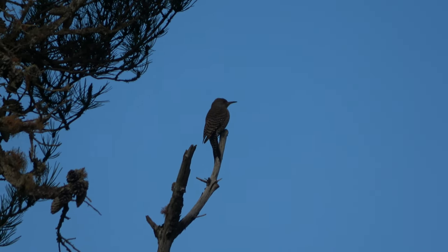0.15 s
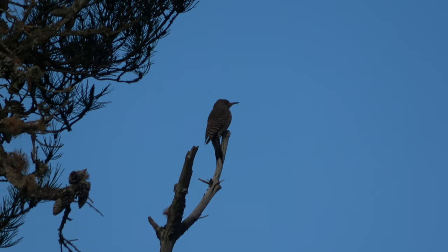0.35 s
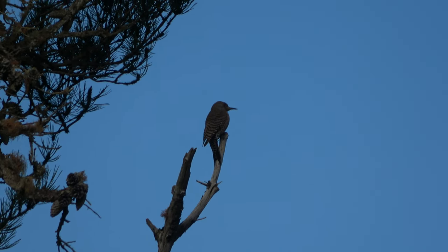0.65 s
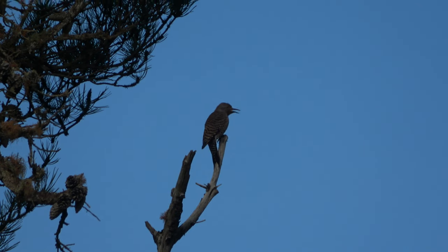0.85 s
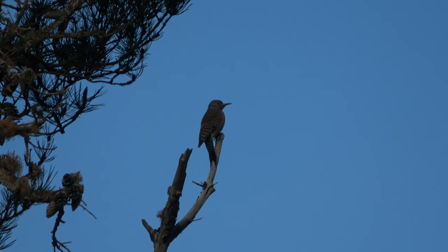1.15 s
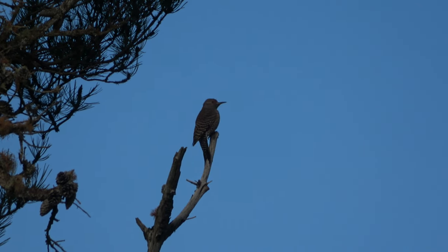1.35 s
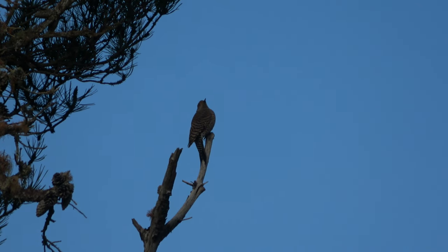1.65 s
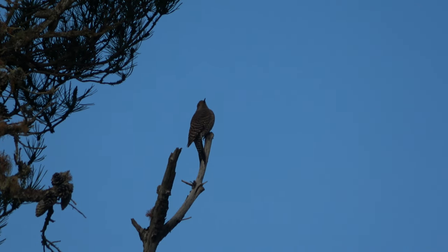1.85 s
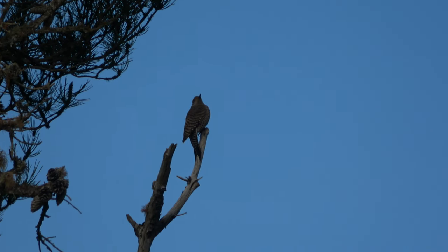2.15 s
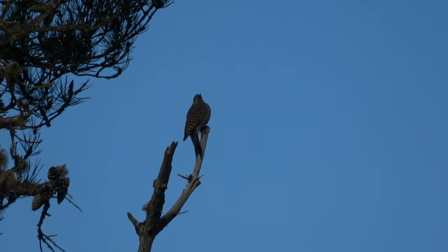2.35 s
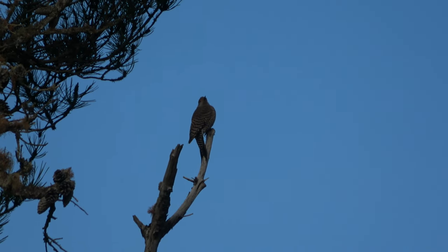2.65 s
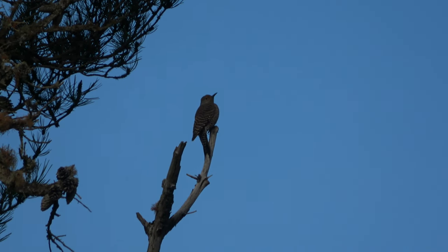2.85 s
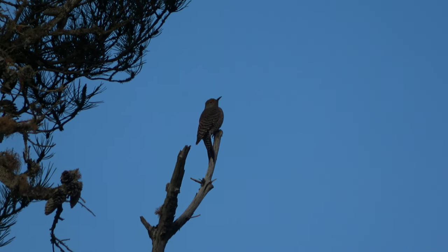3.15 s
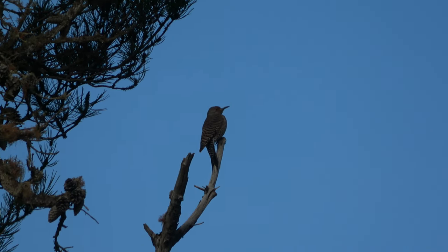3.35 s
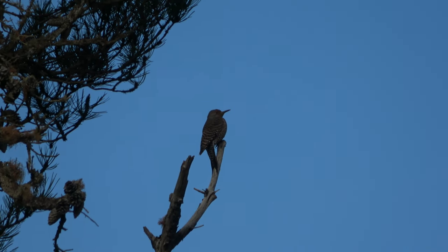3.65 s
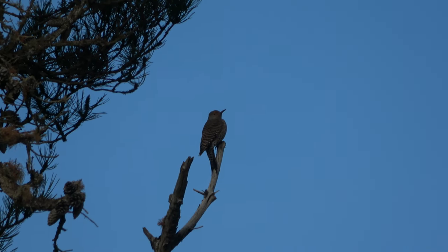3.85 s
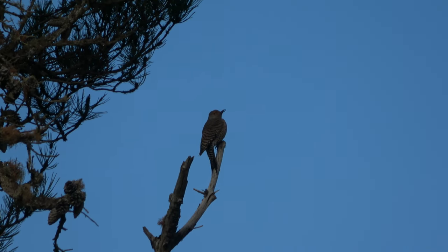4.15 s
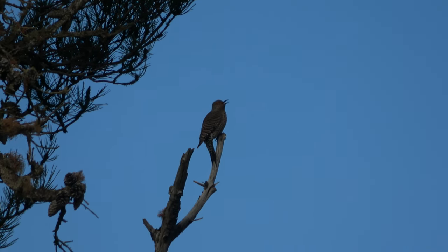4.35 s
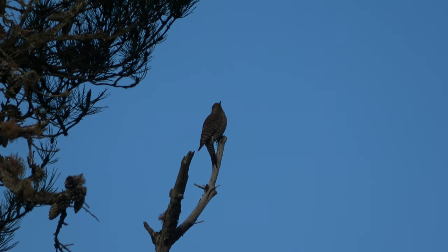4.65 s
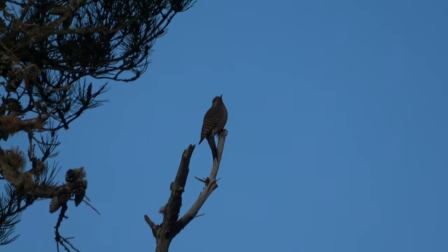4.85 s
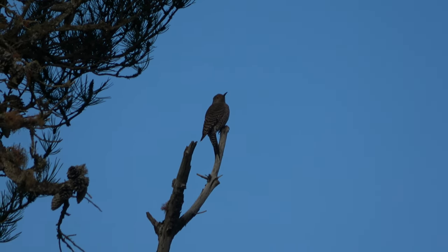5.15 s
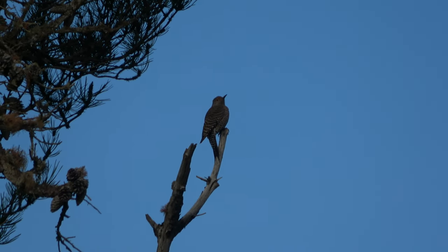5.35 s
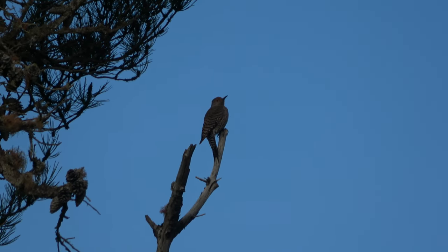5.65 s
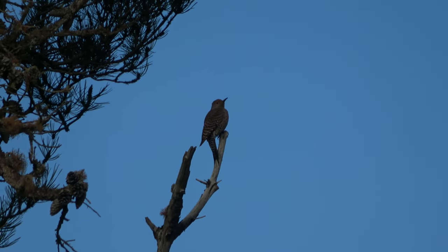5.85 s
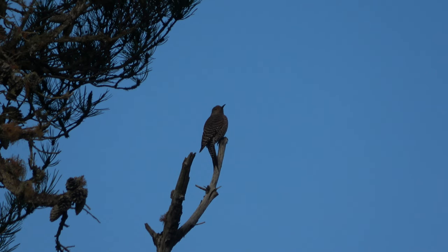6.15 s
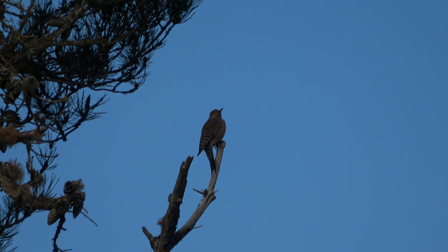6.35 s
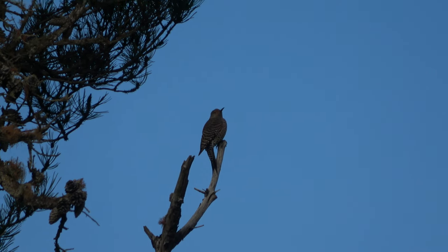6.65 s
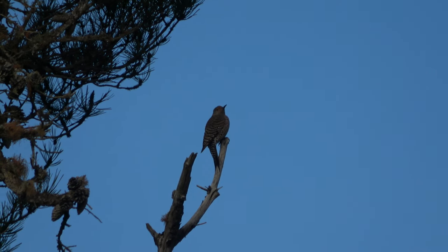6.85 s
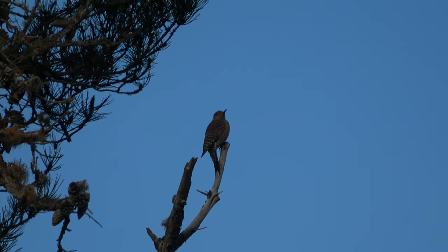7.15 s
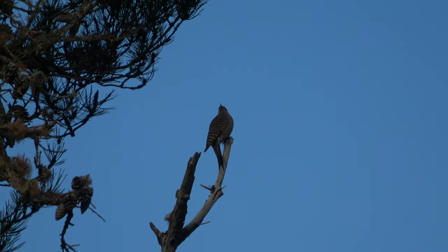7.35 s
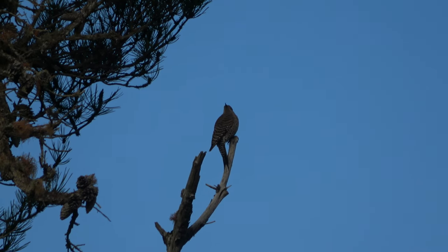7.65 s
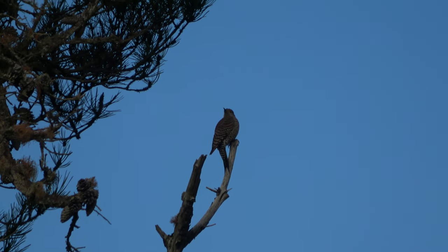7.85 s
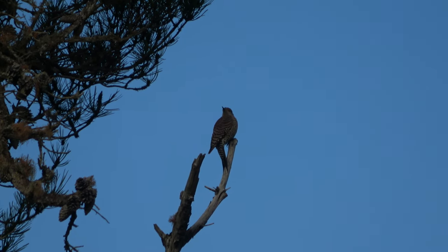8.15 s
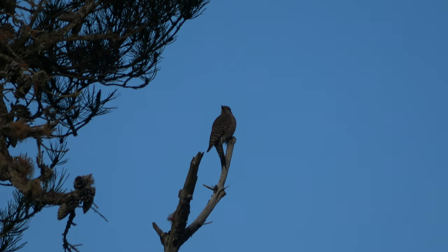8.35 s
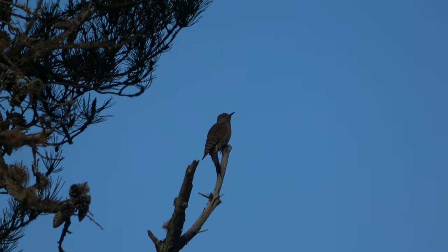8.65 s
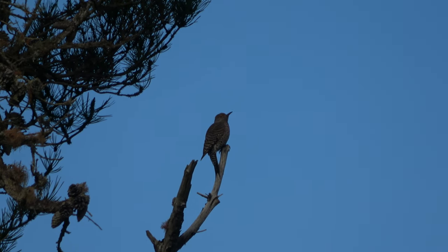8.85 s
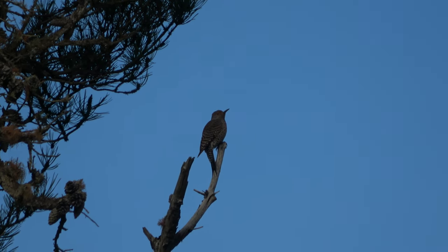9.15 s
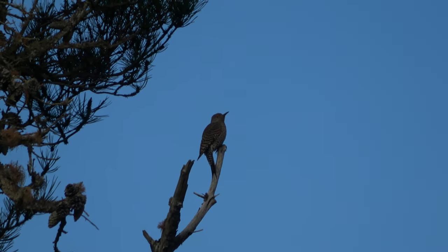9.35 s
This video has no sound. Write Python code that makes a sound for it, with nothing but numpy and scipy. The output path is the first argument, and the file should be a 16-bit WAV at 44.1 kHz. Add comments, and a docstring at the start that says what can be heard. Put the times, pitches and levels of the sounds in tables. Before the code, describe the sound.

A woodpecker perched outdoors gives a few chips and three loud down-slurred calls, widely spaced, over faint distant rumble and soft hiss.

```python
"""A bird rasps twice to the right, first at once; a young woodpecker chips, then gives three down-slurred calls.
Its voice is a stack of overtones flipping between chest and an octave-higher whistle; trunks echo it, with a tail.
Midway a far vehicle gathers speed as two summed tones; later a distant bird whistles twice, as gliding sines.
Throughout, shaped noise makes a far rumble and faint microphone hiss, and two engine tones beat."""
import sys
import numpy as np
from scipy import signal
from scipy.fft import rfft, irfft
from scipy.io import wavfile
from scipy.ndimage import uniform_filter1d

SR = 44100
rng = np.random.default_rng(int(sys.argv[2]) if len(sys.argv) > 2 else 0)


def log_audio(samples):
    """Write samples as a 16-bit WAV file to the path given in sys.argv[1]."""
    # one column per channel
    frames = np.atleast_2d(samples).T
    # limit to full scale, then quantise
    limited = np.clip(frames, -1, 1)
    pcm = np.round(limited * 32767).astype(np.int16)
    wavfile.write(sys.argv[1], SR, pcm)


N = 419391

# syrinx overtones 1-9 per register; the whistle is weak in odd ones: level_db
CHEST_OVERTONES_DB = [8, -0.5, -6, -9, 4, -10, -12, -24, -40]
WHISTLE_OVERTONES_DB = [-36, 0.5, -38, -6.5, -53, -39, -60, -60, -60]
# throat resonance: freq_hz, gain_db
THROAT_GAIN = [(1000, -11.5), (1900, -8), (2600, -1.5), (3700, 3), (5000, -1), (6000, -1.5), (7400, -6.5),
               (9800, -12), (12000, -11.5), (15500, -25)]
EFFORT_DB_PER_OVERTONE_PER_DB, EFFORT_REFERENCE_DB = .17, -28.5
AIR_BAND_HZ, AIR_GAIN_DB = [1300, 6430], 2  # rush of air in rough onsets
AIR_LEAK = 0.026  # share of that rush under clear notes
ROUGH_FLOOR, ROUGH_PITCH_SHARE, ROUGH_RATE_HZ = .06, 0.41, 524

# Note shapes: time_stage, glide_stage, under_peak_db, whistle_0_1, rough_0_1 (before the floor)
# Note rows: stage_times_s, stage_pitches_hz, peak_db (before overtone gains), shape_depth,
# beak_db_per_overtone
# chip starts rough and climbs
RISE_SHAPE, RISE_ROWS = [(0, 0, -25, .2, 0.5), (.35, 0.49, -9.5, 0.32, .5), (.62, 0.653, -0.5, 0.36, 0.24),
                         (.82, .95, -12.5, 0.24, 0.36), (1, 1, -22, .2, 0.5)], [([.778, .804], [1730, 2850], -33.5, 1, -2.7), ([2.631, 2.659],
                                       [2014, 2760], -38.5, 1.05, -5), ([4.284, 4.312], [1950, 2550],
                                       -48, 0.74, 2), ([6.710, 6.734], [1690, 2450], -45, 0.64, 1.8)]
# its whistled top arches
PIP_SHAPE, PIP_ROWS = [(0, 0, -20, .95, .05), (.25, .6, -8.5, .95, .05), (.55, 1, 0, .9, .05),
                       (.8, 1.4, -10, .95, .05), (1, 2, -24, .95, .05)], [([.800, 0.831], [2960, 3050, 2960], -32, 1.3, -2.3), ([2.666, 2.686],
                                    [3090, 3100, 3010], -46, 0.99, -3), ([6.729, 6.772], [2735, 2752, 2760],
                                    -44.5, .6, 1)]
# its drop
DROP_SHAPE, DROP_ROWS = [(0, 0, -10, .1, .25), (.25, .45, -6, 0.21, .25), (.46, 0.67, -0.5, .35, .12),
                         (.75, .85, -13, .2, .15), (1, 1, -19, .2, .1)], [([.830, .872], [2700, 1300], -49, .6, -2), ([2.684, 2.708],
                                       [2400, 1600], -42, 1.0, .1), ([4.336, 4.354], [2820, 1900],
                                       -43, 1.0, 1.5), ([6.764, 6.788], [2400, 1720], -45, 0.87, 1.8)]
# slurred call opens in the chest and cracks upward
ONSET_SHAPE, ONSET_ROWS = [(0, 0, -19, .05, .12), (.15, .05, -5, .05, .15), (.33, -.3, -1.5, 0.069, 0.067),
                           (.47, 1.42, -4, .1, 0.14), (.57, .4, -5.5, .6, .08), (.75, 0.92, 0, .7, .05),
                           (1, 1, -19, .9, .03)], [([.917, .950], [1900, 2130], -36.5, 1.0, 2.5), ([4.352, 4.385],
                                          [1900, 2080], -33.5, 1.0, 1.6), ([8.573, 8.608], [1930, 2070],
                                          -36, 1.1, 2)]
# loud sagging whistle in two swells; times: start, dip, end
WHISTLED_SHAPE, WHISTLED_ROWS = [(0, 0, -18, .98, .05), (.3, .4, -2, .9, .05), (.75, .8, 0, .95, .04),
                                 (1, 1, -6, .95, .04), (1.2, 1.3, 0, .8, .04), (1.55, 1.8, -8, .4, .07),
                                 (2, 2, -24, .55, 0.079)], [([.938, .963, .994], [2680, 2440, 2380], -29.5, .9, 3.5),
                                                   ([4.372, 4.389, 4.418], [2610, 2495, 2390],
                                                   -28, .9, 4.1), ([8.596, 8.612, 8.636],
                                                   [2580, 2500, 2430], -29, 1.1, 3.5)]
# soft held tones, mostly from the other side of the syrinx; the 4.299 s row is the third chip's low rising top
SOFT_TONE_SHAPE, SOFT_TONE_ROWS = [(0, 0, -16, .9, .04), (.22, .2, -0.5, .9, .04), (.65, .7, -5, .9, .05),
                             (1, 1, -16, 0.82, .04)], [([0.98, 1.002], [1840, 1790], -40.5, .9, -2), ([4.299, 4.336],
                                             [1180, 1460], -44, 0.75, -2), ([4.412, 4.433], [1775, 1765],
                                             -41, 1.0, 3), ([8.632, 8.651], [1860, 1770], -43, .9, 1)]
# swoops, throbs three times, breaks, falls away; times: start, three throbs, break, knee, end
SLUR_SHAPE, SLUR_ROWS = [(0, 0, -36, .1, .14), (.4, .6, -17, .1, .06), (.6, .685, -7, .2, .05),
                         (.9, .745, -3, .5, .04), (1.05, .762, -1, 0.27, .04),
                         (1.5, .78, -10.5, 0.045, .04), (2, .81, 0, 0.17, .03), (2.55, .85, -9.5, .08, .05),
                         (3, .9, -4.5, 0.24, 0.063), (3.6, .93, -8, .08, .08), (4, 0.98, -13, .2, .09),
                         (4.15, 1.5, -12, .08, .1), (4.45, 1.76, -10, .13, .12), (4.7, 1.9, -16, .15, .1),
                         (5, 2, -10, .2, .1), (6, 3, -34, .05, .06)], [([.988, 1.020, 1.050, 1.076, 1.084, 1.125, 1.137],
                                       [2820, 1603, 1216, 1140], -30.5, .9, -.5),
                                       ([4.420, 4.447, 4.480, 4.503, 4.519, 4.560, 4.569],
                                       [2860, 1603, 1210, 1120], -29.5, .8, .5),
                                       ([8.634, 8.669, 8.696, 8.711, 8.722, 8.748, 8.780],
                                       [2900, 1645, 1400, 1150], -29, 1.2, .1)]

# direct-sound stereo: freq_hz, left_minus_right_db
BIRD_BALANCE_DB = [(1200, -4), (2000, -3.5), (4000, 1.5), (7000, -0.5), (10000, -5), (14000, 3)]
# nearby trunks: delay_s, level_db, left_minus_right_db
TRUNK_ECHOES = [(.040, -20.5, -8), (.078, -25.5, -6)]
# early scatter decay: freq_hz, t60_s
WOOD_DECAY_S = [(1000, 0.33), (2000, 0.59), (3700, 0.56), (5000, 0.41), (7000, 0.45), (12000, 0.34)]
# scatter colour: freq_hz, gain_db
WOOD_COLOUR_DB = [(1500, 1.5), (2600, -1), (3700, 2), (4600, 6.5), (5600, 2.5), (8000, -4), (12000, 10.5)]
FAR_EDGE_DB, FAR_EDGE_SLOWER = -13.5, 2.7  # far edge of the wood: weaker, dies slower
WOOD_GAIN_DB, WOOD_RISE_S, WOOD_ALIKE = -42, 0.0018, .9
FLUTTER_DB, FLUTTER_HZ = 1, 40  # moving needles shake the tail

# raspy calls: start_s, end_s, closing_level_db (before edge fade), closing_pitch_ratio
RASP_CALLS = [(.015, 0.476, -67, .99), (1.71, 2.12, -69, .92)]
# rasp throat bands: freq_hz, noise_corner_hz, relative_db
RASP_THROAT_BANDS = [(4070, 330, -8), (4480, 330, 0), (5160, 360, -5), (6060, 440, -2.5)]
RASP_BUZZ_DEPTH, RASP_BUZZ_START_HZ, RASP_BUZZ_END_HZ = 0.23, 150, 134
RASP_ATTACK_S, RASP_RELEASE_S, RASP_EDGE_DB = .025, .025, -14
RASP_GROWS_DB, RASP_SLIDE_RATIO, RASP_PAN_DB = 4.5, .02, -12.5

# distant bird: time_s (onset 8 ms earlier), peak_db, mean_pitch_hz
FAR_BIRD_CHIRPS = [(7.0783, -65, 3330), (8.0396, -63, 3240)]

# far vehicle gathering speed: time_s, pitch_hz, level_db
VEHICLE_PULL = [(4.5, 124, -66), (4.85, 149, -63), (5.35, 157, -62), (6.1, 152, -63), (6.5, 146, -68)]

ENGINE_HZ, ENGINE_RMS_DB = 69.43, -59.3
# second engine, a little faster, then slowing: time_s, beats_elapsed, rms_db
SECOND_ENGINE_BEATS = [(0, 0, -65), (2.04, 5, -65), (4.08, 10, -62), (5.47, 12.5, -62), (6.86, 15, -61),
                       (8.26, 17, -62), (9.51, 18.5, -63)]
# wavering engine overtones: multiple, rms_db
ENGINE_OVERTONES = [(2, -65.5), (3, -66.5), (4, -69.5), (5, -66)]

# rumble spectrum: freq_hz, relative_density_db
RUMBLE_SPECTRUM = [(13, -46), (22, -7.5), (69, -3.5), (113, -4.5), (200, -1), (339, -3), (530, -5),
                   (713, -1.5), (901, -11.5), (1140, -14.5), (1320, -9), (1470, -17.5), (1670, -22),
                   (2550, -30.5), (3500, -37.5), (4550, -62), (7700, -120)]
# added humps: freq_hz, width_hz, peak_db
RUMBLE_HUMPS = [(777, 300, 1), (1303, 84, 6)]
# rumble stereo: freq_hz, left_minus_right_db
RUMBLE_BALANCE_DB = [(60, -5), (150, -6), (380, -4.5), (950, -3.5), (2380, -4.5), (5980, -6), (15000, 0.0)]
# rumble stereo: freq_hz, likeness_0_1
RUMBLE_LIKENESS = [(60, 0.93), (180, 1), (550, 0.91), (1650, 0.94), (4970, 0.36), (15000, 0.44)]
# bass band that comes and goes: time_s, gain_db
BASS_SWELL = [(0, 3), (1, -0.5), (2, 2.5), (3, -8), (4, 2.5), (4.8, 2), (5.8, 3), (6.6, 1), (7.5, 3),
              (8.5, 2.5), (9.51, 3.5)]
RUMBLE_RMS_DB, SWELL_HZ, SWELL_WIDTH_HZ = -50, 152, 62

# hiss spectrum, held above 15 kHz: freq_hz, relative_density_db
HISS_SPECTRUM = [(1470, 0.5), (2500, -8.5), (3100, -5.5), (4980, -5), (5840, -1), (7190, -1.5),
                 (15000, -7.5), (15600, -26)]
# hiss stereo: freq_hz, likeness_0_1
HISS_LIKENESS = [(2500, 0.98), (4500, 0.75), (7000, 0.047), (11000, 0.49), (15000, 0.75)]
HISS_RMS_DB = -66.5

CUTOFF_HZ = 15790


def amp(db):
    """Decibels to gain."""
    return 10 ** (np.asarray(db) / 20)


def rms_one(x):
    """Scale to unit power."""
    return x / np.sqrt(np.mean(x ** 2) + 1e-20)


def at_hz(points, hz):
    """Interpolate a table on a log-frequency axis."""
    table_hz, values = np.transpose(points)
    return np.interp(np.log(np.maximum(hz, 1)), np.log(table_hz), values)


def pan(db):
    """Left and right gains for a left-minus-right level difference."""
    half_db = np.asarray(db) / 2
    return amp(np.array([half_db, -half_db]))


def wander(rate_hz, size):
    """Unit-power noise through two equal low-pass poles."""
    r = np.exp(-2 * np.pi * rate_hz / SR)
    noise = rng.standard_normal(size + SR)
    settled = signal.lfilter([1], [1, -2 * r, r * r], noise)[SR:]
    return rms_one(settled)


def stereo_noise(gain, alike, size):
    """Left and right noise spectra whose mid and side shares set their likeness."""
    alike = np.clip(alike, 0, 1)
    mid, side = rfft(rng.standard_normal((2, size)))
    return gain * (np.sqrt(1 + alike) * mid + np.sqrt(1 - alike) * side * [[1], [-1]])


def notes():
    """Lay each note shape over the times and pitches of its rows."""
    kinds = [(RISE_SHAPE, RISE_ROWS), (PIP_SHAPE, PIP_ROWS), (DROP_SHAPE, DROP_ROWS),
             (ONSET_SHAPE, ONSET_ROWS), (WHISTLED_SHAPE, WHISTLED_ROWS),
             (SOFT_TONE_SHAPE, SOFT_TONE_ROWS), (SLUR_SHAPE, SLUR_ROWS)]
    for shape, rows in kinds:
        stage, glide, under_db, whistle, rough = np.transpose(shape)
        for times_s, pitches_hz, peak_db, depth, beak_db in rows:
            # stages outside the pitch list extrapolate its end segments
            step = np.clip(glide.astype(int), 0, len(pitches_hz) - 2)
            hz = np.take(pitches_hz, step) + (glide - step) * np.diff(pitches_hz)[step]
            s = np.interp(stage, np.arange(len(times_s)), times_s)
            yield s, hz, peak_db + depth * under_db, whistle, rough, beak_db


def woodpecker():
    """Syrinx overtones weighted by register and throat; roughness shakes the pitch and lets air rush."""
    out = np.zeros(N)
    air_filter = signal.butter(4, AIR_BAND_HZ, "band", fs=SR, output="sos")
    air = rms_one(signal.sosfilt(air_filter, rng.standard_normal(N)))
    for s, *columns, beak_db in notes():
        at = np.arange(int(s[0] * SR), int(s[-1] * SR))
        hz, level_db, whistle, rough = [np.interp(at / SR, s, c) for c in columns]
        whistle = np.clip(whistle, 0, 1)
        # whistles and steady notes stay pure
        rough = np.clip(rough - ROUGH_FLOOR, 0, 1) * (1 - whistle)
        shake = ROUGH_PITCH_SHARE * rough * wander(ROUGH_RATE_HZ, size=len(at))
        hz = uniform_filter1d(hz, size=60) * (1 + shake)
        phase = 2 * np.pi * np.cumsum(hz) / SR
        fade = signal.windows.tukey(len(at), .15)
        out[at] += fade * (rough + AIR_LEAK) * amp(level_db + AIR_GAIN_DB) * air[at]
        effort_db = EFFORT_DB_PER_OVERTONE_PER_DB * (level_db - EFFORT_REFERENCE_DB)
        registers = zip(CHEST_OVERTONES_DB, WHISTLE_OVERTONES_DB)
        for k, (chest_db, whistle_db) in enumerate(registers, start=1):
            register_db = chest_db + whistle * (whistle_db - chest_db)
            bright_db = max(k - 2, 0) * (beak_db + effort_db)
            gain = amp(level_db + register_db + at_hz(THROAT_GAIN, k * hz) + bright_db)
            below_alias = k * hz < SR / 2.2
            out[at] += fade * gain * below_alias * np.sin(k * phase)
    return out


def woodland(x):
    """Trunks give two clear echoes, then scatter that swells and dies at a rate set by frequency."""
    out = irfft(rfft(x) * pan(at_hz(BIRD_BALANCE_DB, np.fft.rfftfreq(N, 1 / SR))), N)
    for delay_s, echo_db, pan_db in TRUNK_ECHOES:
        late = np.interp(np.arange(N) - delay_s * SR, np.arange(N), x)
        out = out + amp(echo_db) * pan(pan_db)[:, None] * late
    scatter = irfft(stereo_noise(0.56, WOOD_ALIKE, size=SR), SR)
    hz, s, cells = signal.stft(scatter, SR, nperseg=256)
    near_db = -60 * s / at_hz(WOOD_DECAY_S, hz)[:, None]
    decay = amp(near_db) + amp(FAR_EDGE_DB + near_db / FAR_EDGE_SLOWER)
    rise = 1 - np.exp(-s / WOOD_RISE_S)
    cells = cells * amp(at_hz(WOOD_COLOUR_DB, hz)[:, None]) * decay * rise
    response = signal.istft(cells, SR, nperseg=256)[1][:, :SR]
    tail = signal.fftconvolve(x[None], response, axes=1)[:, :N]
    tail_gain = amp(WOOD_GAIN_DB + FLUTTER_DB * wander(FLUTTER_HZ, size=N))
    return out + tail_gain * tail


def rasp():
    """Noise pulsed at the buzz rate, in narrow throat bands that slide up a little."""
    out = np.zeros(N)
    for start_s, end_s, close_db, pitch in RASP_CALLS:
        at = np.arange(int(start_s * SR), int(end_s * SR))
        gone = np.linspace(0, 1, len(at))
        attack = 1 - (at / SR - start_s) / RASP_ATTACK_S
        release = 1 - (end_s - at / SR) / RASP_RELEASE_S
        edge = np.clip(np.maximum(attack, release), 0, 1)
        level_db = close_db - RASP_GROWS_DB * (1 - gone) + RASP_EDGE_DB * edge
        buzz_hz = np.interp(gone, [0, 1], [RASP_BUZZ_START_HZ, RASP_BUZZ_END_HZ])
        buzz = np.sin(2 * np.pi * np.cumsum(buzz_hz) / SR)
        pulsed = amp(level_db) * (1 + RASP_BUZZ_DEPTH * buzz)
        shift = pitch + RASP_SLIDE_RATIO * (gone - 1)
        for hz, corner_hz, band_db in RASP_THROAT_BANDS:
            phase = 2 * np.pi * hz * np.cumsum(shift) / SR
            band = wander(corner_hz, size=len(at)) * np.sin(phase)
            band = band + wander(corner_hz, size=len(at)) * np.cos(phase)
            out[at] += amp(band_db - 3) * pulsed * band  # -3 dB: bands sum to about unit power
    return pan(RASP_PAN_DB)[:, None] * out


def far_bird():
    """Short soft sine whistles that rise a little."""
    out, t = np.zeros(N), np.arange(int(0.024 * SR)) / SR
    cycles_s = t + 1.9 * (t ** 2 - t * t[-1])  # linear upward glide about the mean pitch
    for s, peak_db, hz in FAR_BIRD_CHIRPS:
        chirp = amp(peak_db) * np.hanning(len(t)) * np.sin(2 * np.pi * hz * cycles_s)
        out[int((s - .008) * SR):][:len(t)] += chirp
    return out


def vehicle():
    """A low unsteady tone and its lower octave climb, hold and sag."""
    s, hz, level_db = np.transpose(VEHICLE_PULL)
    at = np.arange(int(s[0] * SR), int(s[-1] * SR))
    phase = 2 * np.pi * np.cumsum(np.interp(at / SR, s, hz)) / SR
    tone = np.sin(phase) + amp(-4) * np.sin(phase / 2)
    tone = tone * (1 + .45 * wander(4, size=len(at)))
    gain = np.sqrt(2) * amp(np.interp(at / SR, s, level_db))
    out = np.zeros(N)
    out[at] = gain * signal.windows.tukey(len(at), .2) * tone
    return pan(-4.5)[:, None] * out


def hum():
    """Two low engine tones beat slowly as their phases slip, with wavering overtones."""
    s, beats, second_db = np.transpose(SECOND_ENGINE_BEATS)
    t = np.arange(N) / SR
    phase = 2 * np.pi * ENGINE_HZ * t
    first = amp(ENGINE_RMS_DB) * np.sin(phase)
    second_phase = phase + 2 * np.pi * np.interp(t, s, beats)
    second = amp(np.interp(t, s, second_db)) * np.sin(second_phase)
    out = np.sqrt(2) * (first - second)
    for k, over_db in ENGINE_OVERTONES:
        waver = 1 + wander(2.5 * k, size=N)
        out = out + amp(over_db) * rms_one(waver * np.sin(k * phase))
    return pan(-1.1)[:, None] * out


def rumble():
    """Distant noise with two humps and a swelling bass band, louder on the right."""
    hz = np.fft.rfftfreq(N, 1 / SR)
    humps_db = sum(peak_db / (1 + (2 * (hz - at) / width) ** 2) for at, width, peak_db in RUMBLE_HUMPS)
    gain = amp(at_hz(RUMBLE_SPECTRUM, hz) + humps_db) * pan(at_hz(RUMBLE_BALANCE_DB, hz))
    noise = stereo_noise(gain, at_hz(RUMBLE_LIKENESS, hz), size=N)
    bass_share = 1 / (1 + (2 * (hz - SWELL_HZ) / SWELL_WIDTH_HZ) ** 2)
    swell = amp(np.interp(np.arange(N) / SR, *np.transpose(BASS_SWELL)))
    bass = swell * irfft(noise * bass_share, N)
    rest = irfft(noise * (1 - bass_share), N)
    return amp(RUMBLE_RMS_DB) * rms_one(bass + rest)


def hiss():
    """Smooth noise of air and microphone, partly alike left and right."""
    hz = np.fft.rfftfreq(N, 1 / SR)
    gain = amp(at_hz(HISS_SPECTRUM, np.minimum(hz, 15000)))
    noise = stereo_noise(gain, at_hz(HISS_LIKENESS, hz), size=N)
    return amp(HISS_RMS_DB) * rms_one(irfft(noise, N))


def scene():
    """Woodpecker and far bird in the wood; rasps, vehicle and steady background added."""
    birds = woodland(woodpecker() + far_bird())
    return birds + rasp() + vehicle() + hum() + rumble() + hiss()


def record(dry):
    """Steep elliptic low-pass cuts the top."""
    low_pass = signal.ellip(14, .5, 70, CUTOFF_HZ, fs=SR, output="sos")
    return signal.sosfilt(low_pass, dry)


dry = scene()
out = record(dry)
log_audio(out)
```